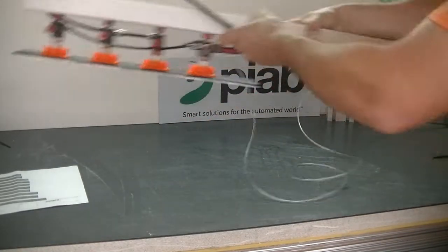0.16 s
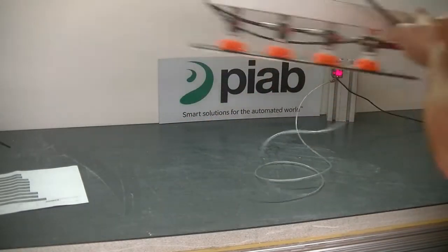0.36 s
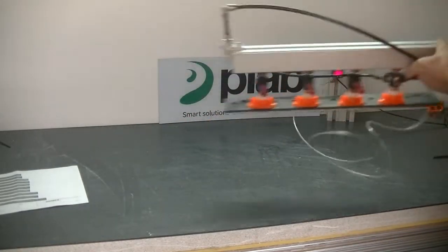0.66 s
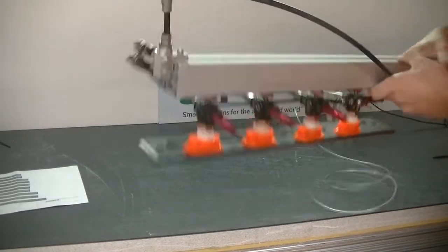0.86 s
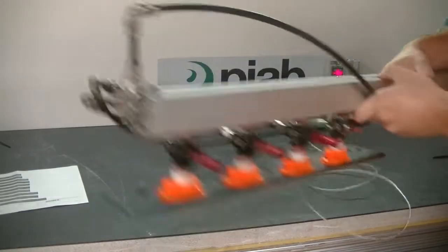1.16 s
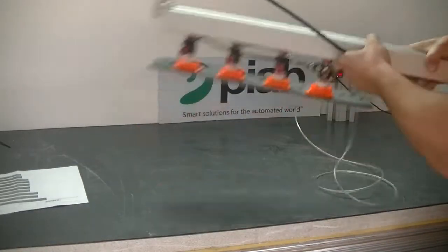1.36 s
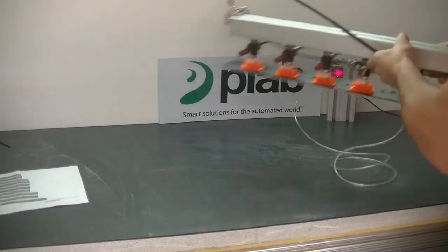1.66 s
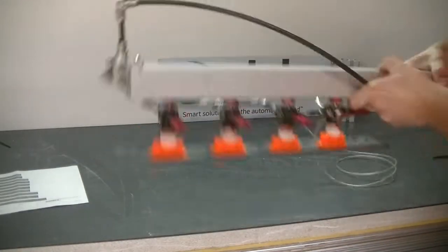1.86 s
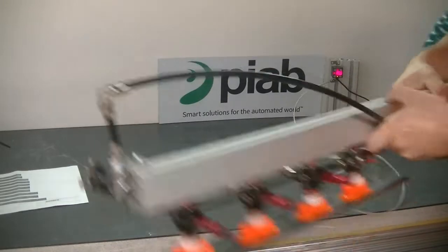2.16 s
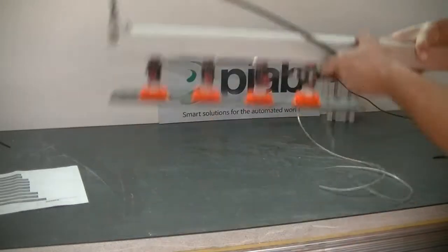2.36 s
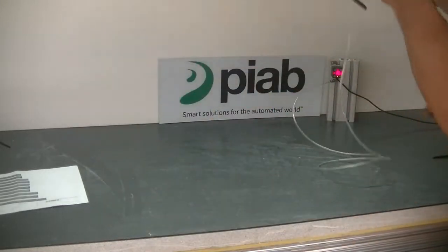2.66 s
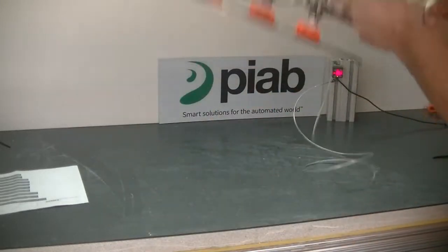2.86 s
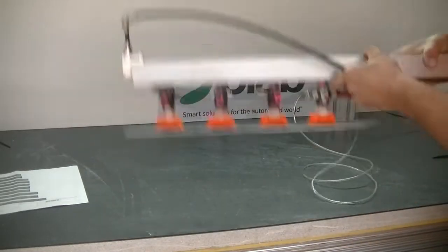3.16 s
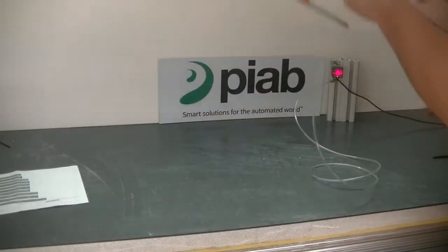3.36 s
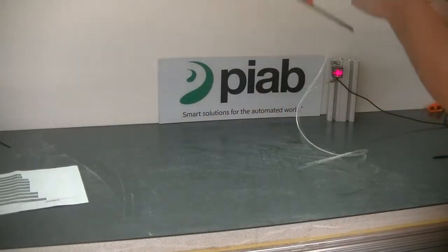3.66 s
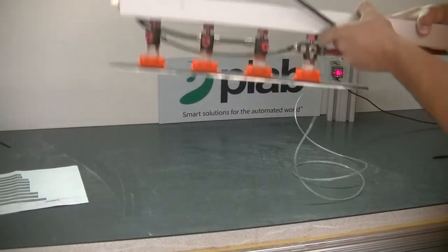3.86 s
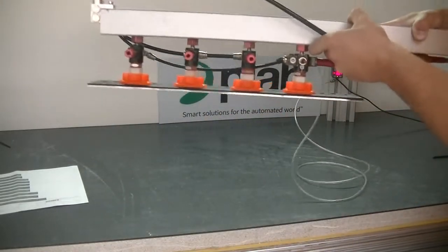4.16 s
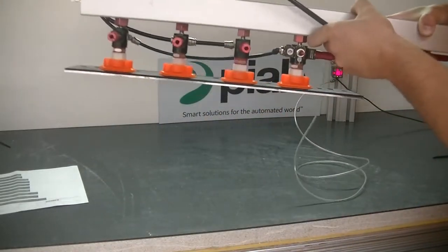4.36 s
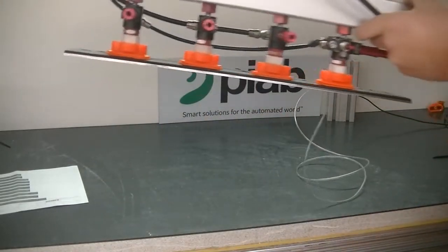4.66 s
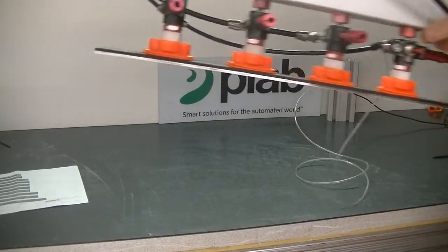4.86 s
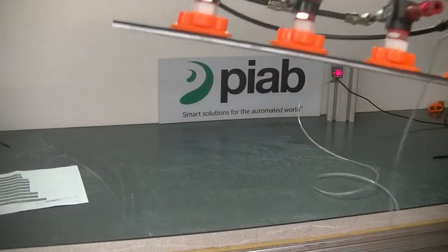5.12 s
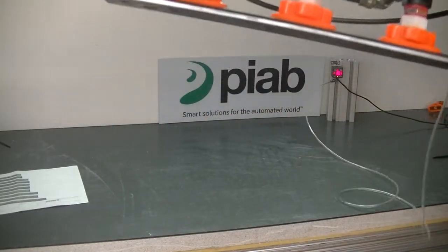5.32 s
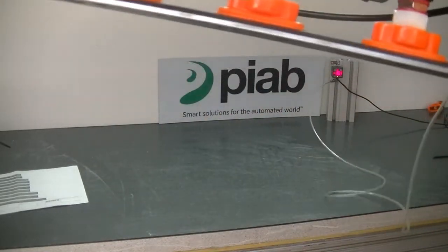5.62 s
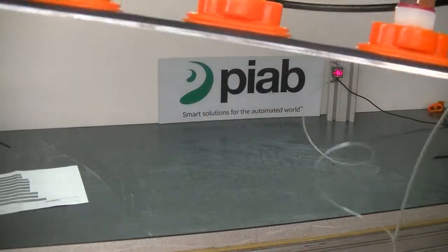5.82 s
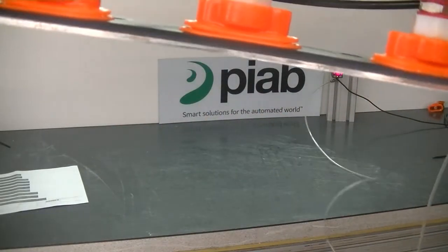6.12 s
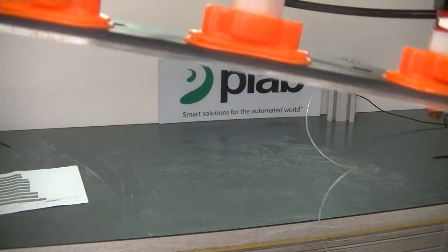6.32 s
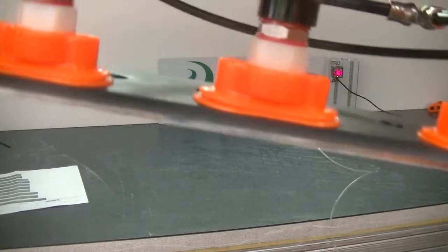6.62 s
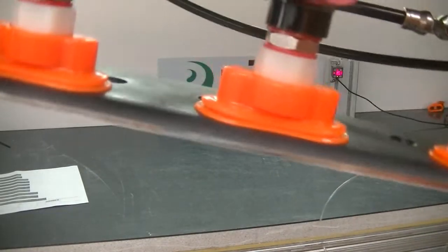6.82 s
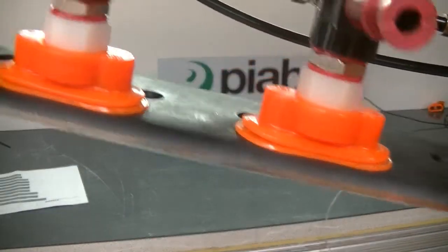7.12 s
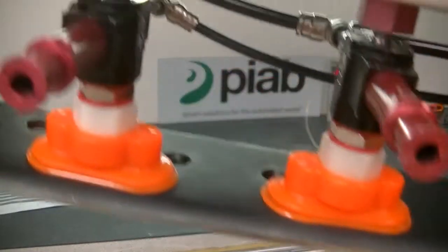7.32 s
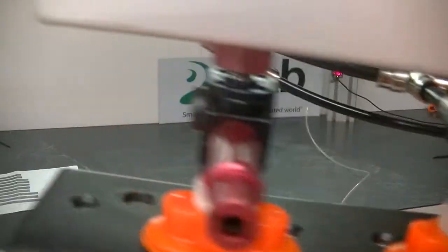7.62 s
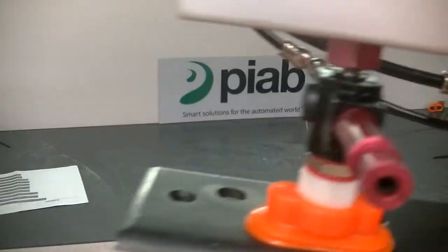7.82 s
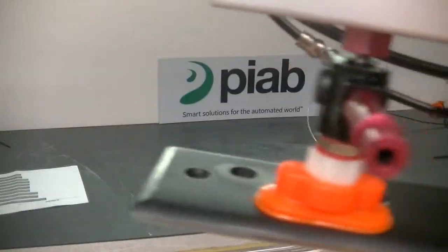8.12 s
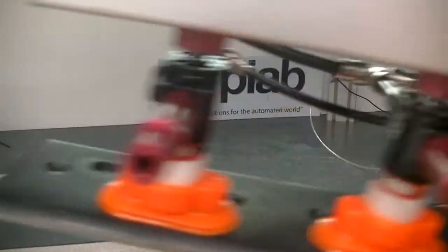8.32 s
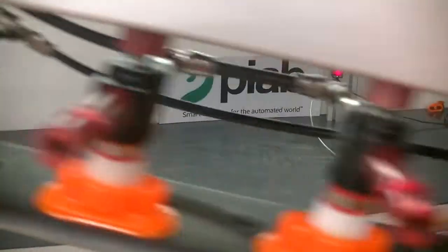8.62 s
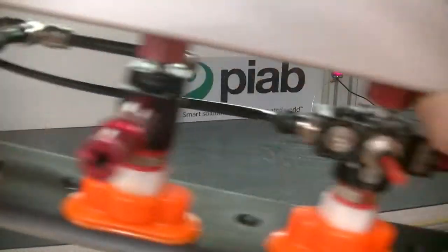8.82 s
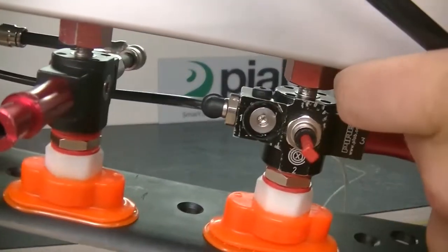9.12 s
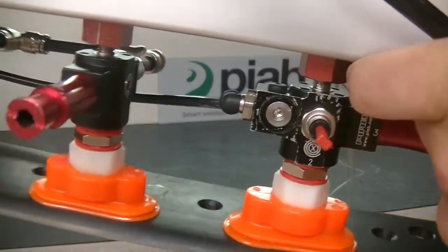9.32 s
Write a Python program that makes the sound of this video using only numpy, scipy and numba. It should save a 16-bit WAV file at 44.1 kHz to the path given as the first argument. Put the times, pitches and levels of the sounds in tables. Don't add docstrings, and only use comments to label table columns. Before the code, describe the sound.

From the start, a loud, dense compressed-air hiss fills a workshop, bright and airy with a hollow tube-like ring near 6 kHz and finer hiss above. It never stops. From 0 to 4 seconds its colour shifts as the hand-held bar swings, the finest treble dulling briefly around 1, 2 and slightly at 3 seconds. Behind it a faint steady motor hum wavers and switches off near 4.9. Small low wind bumps touch the microphone at 4.5 to 5, then hiss alone. From about 6.4 to 7.4 air jets hit the stereo microphone directly: heavy low thumps, rumble and rapid flutter, opposite on each side. Sharper, higher-pitched flapping bursts follow at 7.6 to 7.9, 8.2 to 8.35, 8.5 and 8.75. After 8.9 the buffeting ends and a somewhat softer, very close, wide hiss with flickering lows continues to the end, around 9.5.

```python
import sys
import numpy as np
from scipy import signal
from scipy.fft import rfft, irfft, next_fast_len
from scipy.io import wavfile
from scipy.ndimage import uniform_filter1d
from numba import njit

SR = 44100
rng = np.random.default_rng(int(sys.argv[2]) if len(sys.argv) > 2 else 0)


def natural_amplitude(level_db):
    exponent = np.asarray(level_db, float) / 20
    return 10 ** exponent


def digitize_waveform(pressure):
    field = np.atleast_2d(pressure).T
    bounded = np.clip(field, -1, 1)
    quanta = np.round(bounded * 32767).astype(np.int16)
    wavfile.write(sys.argv[1], SR, quanta)


N = 418068
T = np.arange(N) / SR
LR = np.array([[1], [-1]])

# time in seconds, loudness in dB, aim of the muffler mouths
# (0 across the line of sight to 1 along it), main muffler mode in Hz, left minus right in dB.
BAR_POSE = [(0.0, 0, 0.64, 6250, 2.5), (0.3, 0, .55, 6100, 3), (0.55, -0.5, 0.5, 6180, 2),
            (1.05, -0.5, 0.66, 6330, 2.5), (1.55, -1, 0.46, 6080, 2.5), (2.1, -0.5, 0.69, 6360, 3),
            (2.6, -0.5, 0.17, 6110, 2), (3.11, 0, 0.7, 6140, 2.5), (3.4, -0.5, .2, 6050, 2),
            (3.75, -0.5, 0.26, 6060, 2.5), (4.2, 0.5, 0.74, 6080, 2), (4.55, 0.5, 0.41, 5970, 1.5),
            (5.3, -1.5, .05, 6090, 2), (6.8, -2, 0.15, 6250, 3.5), (7.45, -2.5, 0.19, 6020, 3),
            (8.2, -2.5, 0.38, 6090, 2.5), (8.85, -5.5, 0.76, 6080, 5), (9.48, -4, 0.89, 6150, 1)]
# time in seconds, depth 0-1, half length in seconds.
END_ON_SWINGS = [
    (1.05, 0.63, 0.33),
    (2.118, 0.67, 0.21),
    (3.1, 0.2, 0.15),
    (4.4, 0, 0.7),
    (7.9, 0.14, 0.26),
]
JET_LAYER_HZ = [1800, 4400, 9000, 13300, 14900]
# level in dB, share of the bar loudness 0-1, dB per aim,
# dB when close, dB when tipped, dB when end-on.
JET_LAYERS = [
    (-38, 0.64, 0.57, 0, 1.5, 1.5),
    (-34, 0.12, -0.61, 1, -1.5, 2),
    (-34.5, 0.37, 0.74, 0, 3.5, 7),
    (-36.5, .3, -2.3, 1, -2.5, 0),
    (-36.5, .3, -1.2, 3, -3.5, 0),
]
# frequency in Hz, level in dB.
JET_COLOUR = [(40, -3), (100, -2), (300, -2.5), (700, -1), (1400, 5.5), (2200, 13.5), (2700, 13),
              (4400, 12), (5200, 15.5), (7700, 14), (9000, 9.5), (13500, 15), (14800, 9.5), (15700, 17)]
# frequency in Hz, side minus mid in dB.
FAR_SPREAD = [(40, -35), (4000, -18.5), (4700, -60), (5500, -28), (6500, -4.5), (9000, -3), (11500, -6),
              (15000, -8.5)]
# frequency in Hz, side minus mid in dB.
NEAR_SPREAD = [(40, 0), (1000, 0), (2000, -5), (3200, -16), (4500, -5), (6000, -5), (15000, 2.5)]
# full from in seconds, holds in seconds, rumble in dB,
# flutter in dB, flutter pitch in Hz.
GUST_SWEEPS = [(4.48, 0.19, -43.5, -65, 200), (4.688, .015, -48, -72, 200), (4.89, .02, -44, -72, 200),
               (4.92, 0.057, -44, -65, 190), (6.03, 0.34, -65, -76, 200), (6.392, .04, -35.5, -50, 170),
               (6.455, 0.14, -35.5, -35.5, 165), (6.6, 0.038, -37, -36, 200), (6.694, 0.043, -40, -35, 220),
               (6.78, 0.18, -36, -33.5, 320), (7.004, 0.036, -42, -36.5, 370), (7.09, .1, -46.5, -53, 300),
               (7.237, .03, -40, -40, 334), (7.305, 0.29, -43.5, -46.5, 250), (7.6, 0.076, -31.5, -31, 550),
               (7.705, .05, -39, -32, 500), (7.772, 0.045, -50, -32.5, 520), (7.87, 0.095, -55, -45, 340),
               (8.137, 0.068, -58, -46, 313), (8.192, .04, -48, -35.5, 450),
               (8.251, 0.054, -50, -28.5, 520), (8.33, 0.023, -52, -35.5, 418),
               (8.526, 0.062, -58, -33.5, 453), (8.747, .05, -50, -30.5, 510)]
# time in seconds, left minus right in dB.
GUST_PAN = [
    (4.5, -1.5),
    (7.0, -1),
    (7.6, 0.5),
    (8.9, 1.5),
]
# time in seconds, peak in dB, pitch in Hz, left minus right in dB.
BIG_EDDIES = [(4.698, -25, 120, -6.5), (4.878, -31, 110, 10), (4.931, -29, 70, -9), (6.459, -19, 120, -4),
              (6.601, -21, 160, -3), (6.631, -20.5, 380, -8), (6.696, -24, 190, -9), (6.702, -22, 440, -2),
              (6.772, -18, 440, -10), (6.776, -18, 170, 6), (6.81, -18, 440, 0), (6.854, -23, 90, 2),
              (6.885, -19, 160, -1), (6.935, -19, 140, -1), (6.961, -20, 400, -3), (7.258, -29, 610, -8),
              (7.649, -19, 670, 5), (7.651, -28, 130, 8), (7.758, -22, 490, 3), (7.796, -19, 410, 9.5),
              (7.819, -22, 580, 0), (8.226, -15, 580, 1), (8.257, -18, 750, -8), (8.282, -16, 1040, 5),
              (8.298, -14, 400, 8), (8.332, -18, 580, 5), (8.525, -24, 420, 4), (8.538, -21, 790, 0),
              (8.737, -18, 690, 9), (8.764, -20, 500, -7)]

# lifted to the camera, tipped so its mouths show, then right beside one port (s)
APPROACH_S, TIP_S, NEAR_S = (4.4, 6.1), (7.1, 7.4), 8.86


def mufflers():
    _, aim, main_hz, pan_db = columns(BAR_POSE)
    main_db = heard(-22.5, share=1.5, aim_db=3, close_db=0.5, tipped_db=0.5, end_on_db=1.5)
    upper_db = heard(-24.5, share=0.98, aim_db=-8.5, close_db=1, tipped_db=-1.5, end_on_db=4)
    lower_db = heard(-32, share=1.06, aim_db=-3.5, close_db=2.5, tipped_db=0, end_on_db=-14)
    upper_hz = 11620 - 400 * aim
    lower_hz = 3345 * (1 + 0.012 * walk(2.31))
    main = hiss(main_hz, 1160, main_db + 0.7 * walk(12), pan_db)
    upper = hiss(upper_hz, 2350, upper_db + 0.68 * walk(9), 1.5 * pan_db)
    lower = hiss(lower_hz, 1400, lower_db + 0.98 * walk(9), pan_db)
    return main + upper + lower


def hiss(hz, width, db, pan_db):
    mid = ring(rng.standard_normal(N), hz, width)
    side = ring(rng.standard_normal(N), hz, width)
    return ports(mid, side, np.mean(hz), db, pan_db)


def jets():
    layer_db = [heard(*layer) for layer in JET_LAYERS]
    pan_db = 0.56 * columns(BAR_POSE)[3] + 2.2 * (T > NEAR_S)
    size = next_fast_len(N)
    noise = rfft(rng.standard_normal((2, size)))
    f = np.linspace(0, SR / 2, size // 2 + 1)
    centres = np.concatenate([np.geomspace(30, 2200, num=11), np.linspace(2800, 16000, num=19)])
    out, shimmer = 0, walk(10)
    for hz, alone in zip(centres, np.eye(len(centres))):
        place = np.interp(np.log(hz), np.log(JET_LAYER_HZ), np.arange(len(layer_db)))
        db = sum(max(1 - abs(place - k), 0) * level for k, level in enumerate(layer_db))
        shimmer_db = 0.5 + 0.43 * (hz > 7000)
        db = db + at(JET_COLOUR, hz) + shimmer_db * shimmer + 1.15 * walk(6)
        mid, side = irfft(noise * np.interp(f, centres, alone), size)[:, :N]
        out = out + ports(mid, side, hz, db, pan_db)
    return out


def mirrored(air):
    aim, tipped = columns(BAR_POSE)[1], ramp(TIP_S)
    near = ramp((NEAR_S, NEAR_S + .2))
    high_depth = 0.55 - 0.5 * aim - 0.12 * tipped + .3 * near
    high_hz = ramp((4.9, 6.6), (9500, 8550)) - 600 * near
    low_depth = 0.38 - 0.34 * aim - 0.091 * tipped
    dips = (
        (high_depth, high_hz, 1200),
        (low_depth, 4410, 1000),
        (end_on(), 13100, 6000),
        (0.26, 2685, 260),
    )
    for depth, hz, width in dips:
        air = np.array([x - np.clip(depth, 0, 1) * svf(x, hz + 0 * T, width + 0 * T) for x in air])
    return air


def buffeting():
    s, hold, rumble_db, flutter_db, hz = np.transpose(GUST_SWEEPS)[:, :, None]
    before = np.clip(s - T, 0, .3) / 0.044
    after = np.clip(T - s - hold, 0, .3) / 0.071
    away_db = 20 * (before + after) ** 1.47
    strong = natural_amplitude(flutter_db - away_db)
    flutter_hz = uniform_filter1d(hz[strong.argmax(axis=0), 0], size=1500)
    rumble = natural_amplitude(rumble_db - away_db).max(axis=0) * eddies(99, 120, spike_db=2.0, rate=45)
    flutter = strong.max(axis=0) * eddies(flutter_hz, 1.93 * flutter_hz, spike_db=4.0, rate=300)
    return natural_amplitude(LR * columns(GUST_PAN)[0] / 2) * (rumble + flutter)


def eddies(hz, width, spike_db, rate):
    def uneven():
        return ring(rng.standard_normal(N) * natural_amplitude(spike_db * walk(rate)), hz, width)

    push, own_left, own_right = uneven(), uneven(), uneven()
    return LR * push + 0.77 * np.array([own_left, own_right])


def puffs():
    out = np.zeros((2, N))
    signs = rng.choice([-1, 1], size=len(BIG_EDDIES))
    for (s, db, hz, pan_db), sign in zip(BIG_EDDIES, signs):
        cycles = hz * (T - s)
        close = np.abs(cycles) < 2
        wave = np.exp(-(cycles[close] / 0.59) ** 2) * np.cos(2 * np.pi * cycles[close])
        out[:, close] += sign * LR * natural_amplitude(db - 1.3 + LR * pan_db / 2) * wave
    return out


def motor():
    off_s = 4.88
    turn = 2 * np.pi * np.cumsum(417.2 + 0.82 * walk(3)) / SR
    first_db = ramp((0, off_s), (-51, -53)) + 0.9 * walk(4.4)
    octave_db = ramp((0.6, 1.6), (-57.5, -67.5)) + 2.3 * walk(3.05)
    lines = natural_amplitude(first_db) * np.sin(turn) + natural_amplitude(octave_db) * np.sin(2 * turn)
    return np.sqrt(2) * lines * np.clip((off_s - T) / .2, 0, 1)


def ports(mid, side, centre, db, pan_db):
    near = np.clip((T - NEAR_S) / 0.023, 0, 1)
    side_db = (1 - near) * at(FAR_SPREAD, centre) + near * at(NEAR_SPREAD, centre)
    shade = np.clip(np.log2(centre / 4200) * 2, 0, 1)
    pan_db = shade * pan_db + (1 - shade) * near * 4
    db = db + near * (-4.5 + 2.7 * walk(35)) * (centre < 1500)
    return natural_amplitude(db + LR * pan_db / 2) * (mid + LR * natural_amplitude(side_db) * side)


def heard(db, share, aim_db, close_db, tipped_db, end_on_db):
    loud_db, aim, _, _ = columns(BAR_POSE)
    held_db = db + share * loud_db + aim_db * aim
    return held_db + close_db * ramp(APPROACH_S) + tipped_db * ramp(TIP_S) + end_on_db * end_on()


def end_on():
    return sum(depth * np.exp(-((T - s) / half) ** 2) for s, depth, half in END_ON_SWINGS)


def ramp(span, ends=(0, 1)):
    return np.interp(T, span, ends)


def columns(table):
    s, *rest = np.transpose(table)
    return [np.interp(T, s, c) for c in rest]


def at(points, hz):
    f, v = np.transpose(points)
    return np.interp(np.log(hz), np.log(f), v)


def walk(rate):
    k = int(SR / rate)
    held = np.repeat(rng.standard_normal(N // k + 1), k)[:N]
    return 1.3 * uniform_filter1d(uniform_filter1d(held, k), k)


def ring(x, hz, width):
    hz, width = hz + 0 * T, width + 0 * T
    y = svf(svf(x, hz, width), hz, width)
    return y / np.std(y)


@njit
def svf(x, hz, width):
    y, band, low = np.empty(len(x)), 0., 0.
    for i in range(len(x)):
        g, k = np.tan(np.pi * hz[i] / SR), width[i] / hz[i]
        v = (band + g * (x[i] - low)) / (1 + g * (g + k))
        band, low, y[i] = 2 * v - band, low + 2 * g * v, k * v
    return y


def scene():
    air = mirrored(mufflers() + jets())
    return air + buffeting() + puffs() + motor()


def top_cut(x):
    return signal.sosfilt(signal.butter(12, 15750, fs=SR, output="sos"), x)


def record(dry):
    return top_cut(dry)


dry = scene()
out = record(dry)
digitize_waveform(out)
```